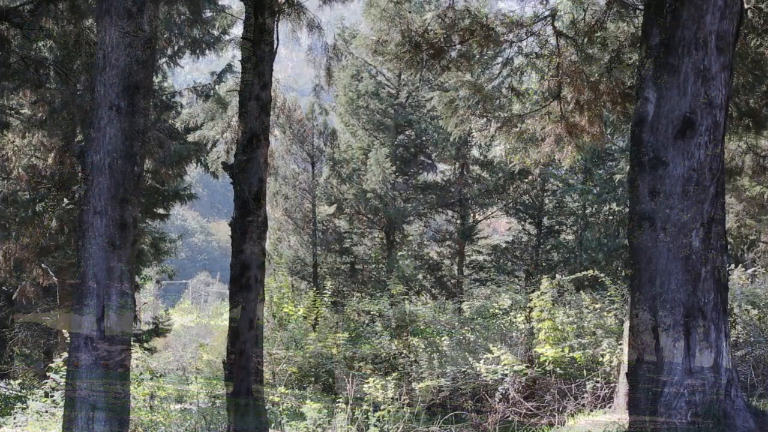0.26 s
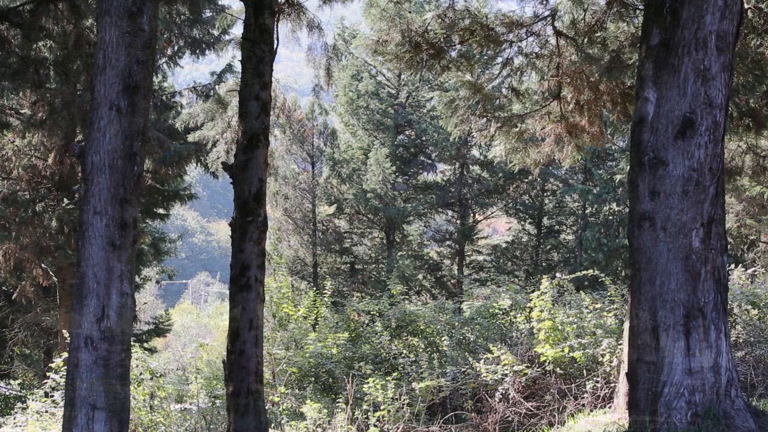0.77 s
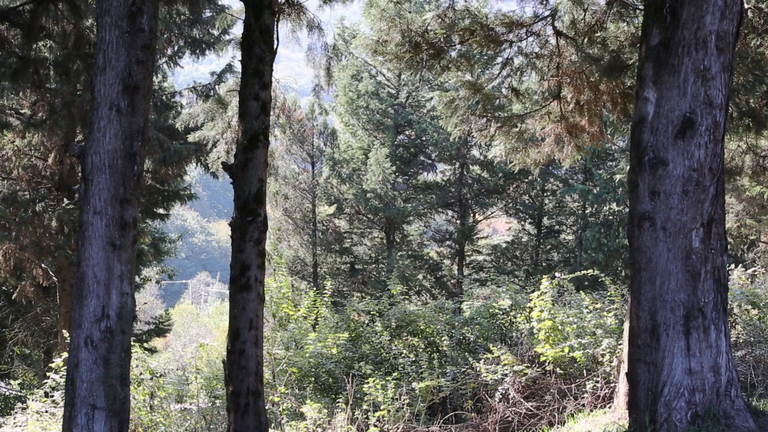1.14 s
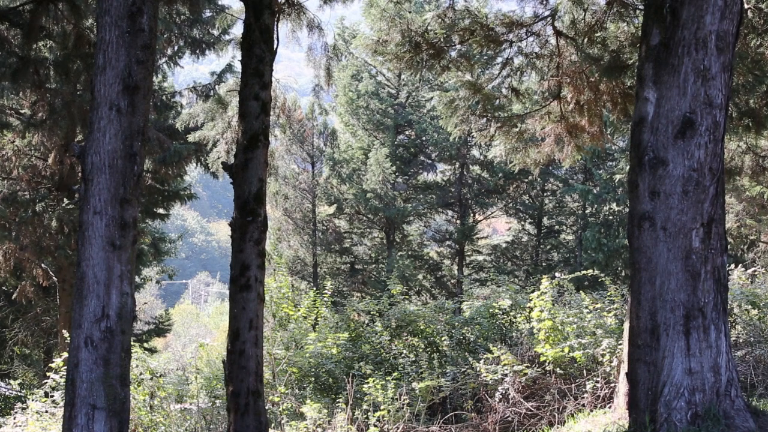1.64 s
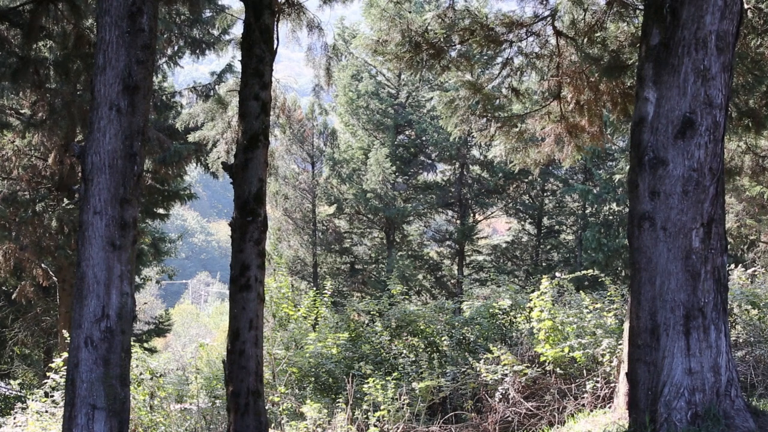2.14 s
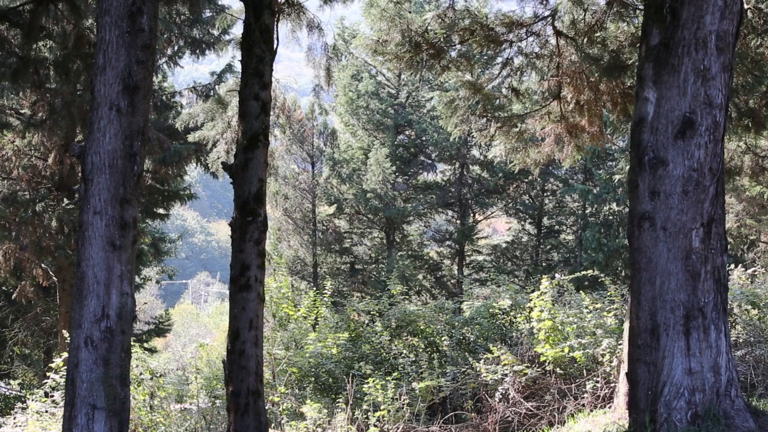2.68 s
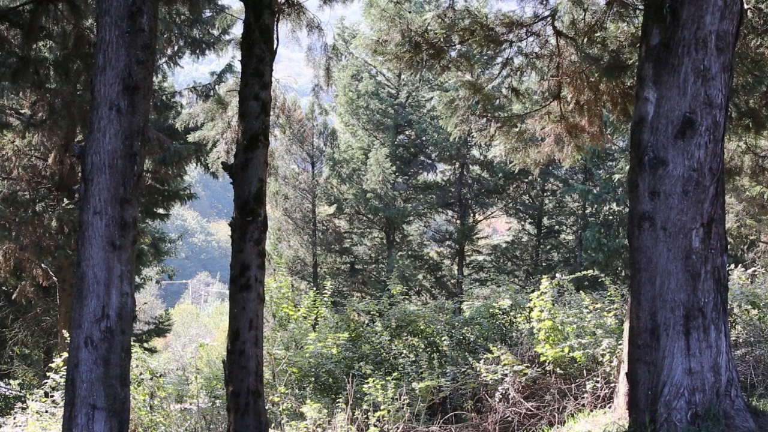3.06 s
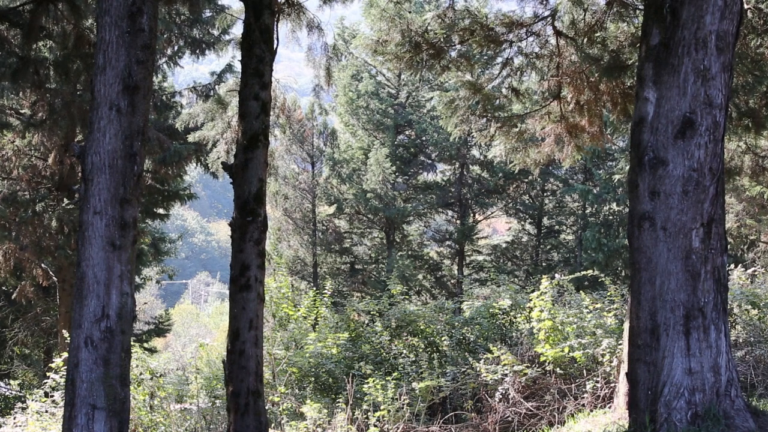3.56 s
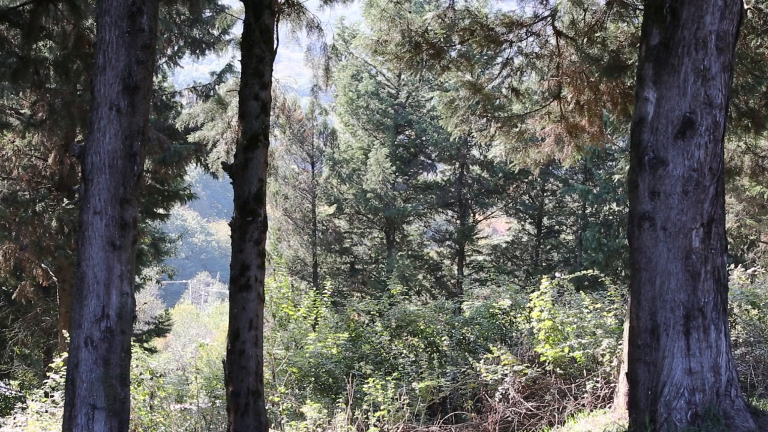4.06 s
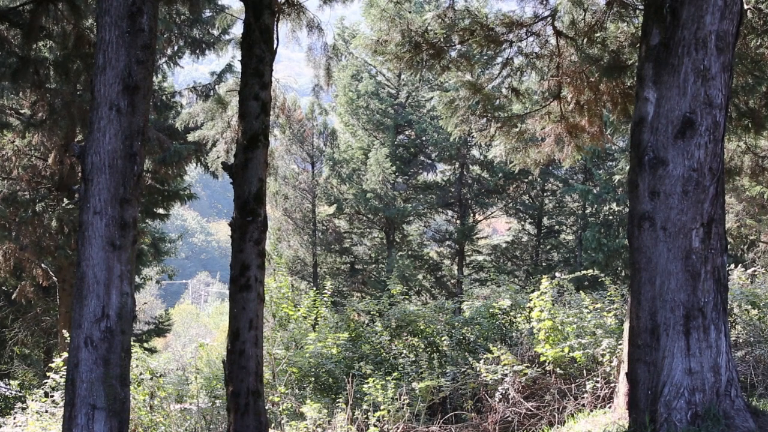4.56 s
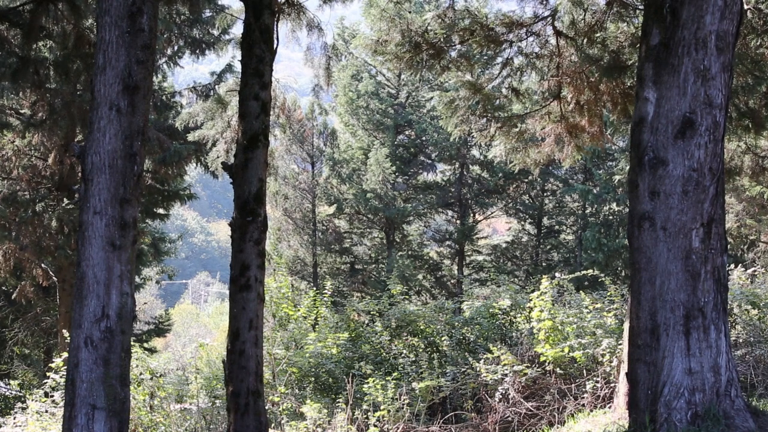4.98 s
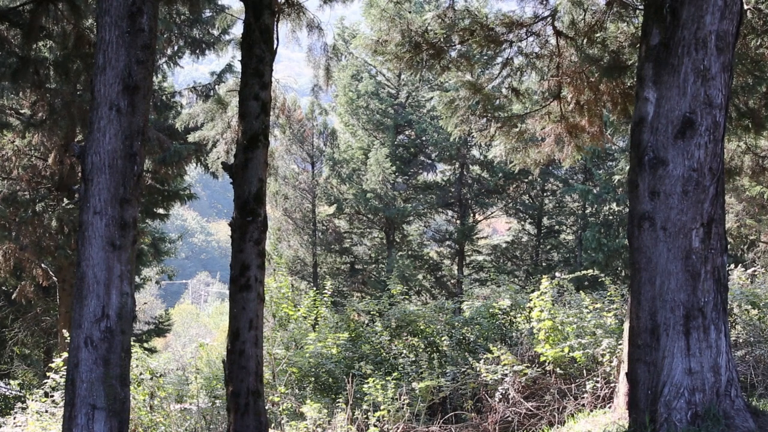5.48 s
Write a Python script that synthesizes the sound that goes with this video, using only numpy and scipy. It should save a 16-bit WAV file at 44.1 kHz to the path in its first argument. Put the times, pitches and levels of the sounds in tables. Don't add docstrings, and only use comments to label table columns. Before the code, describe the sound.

A quiet open wood, heard from a microphone among branches, with low wandering rumble, faint distant hum and smooth hiss throughout. Tiny ticking pips sound at 0.2-0.45 s, then a low, blurred two-voiced rasp until 0.75. At 0.8 the nearest bird gives a very short, piercing fall, much the loudest sound, scattering back from trees as a brief patter. Two hooked whistles with rough onsets come at 1.1 and 1.2, the second higher, rising and louder. Leaves stir softly; a dry twig snaps close by at 2.1. High thin two-voiced phrases run from 2.2 to 2.55, then a slur at 2.7 climbs into quick falling chips until 3.1. Thin bright whistles at 3.2 precede a burred downward phrase at 3.4. Faint far whistles and trills fill gaps. A short high buzz at 4.1, soft hooked warble from 4.4, sagging high whistles from 4.85, and a level whistle at 5.3 finish.

```python
import sys
import numpy as np
from scipy import signal
from scipy.fft import rfft, irfft
from scipy.io import wavfile
from scipy.ndimage import uniform_filter1d

SR = 44100
rng = np.random.default_rng(int(sys.argv[2]) if len(sys.argv) > 2 else 0)


def int16_out(signal):
    q = np.round(np.clip(np.atleast_2d(signal).T, -1, 1) * 32767)
    wavfile.write(sys.argv[1], SR, q.astype(np.int16))


def attenuation_scalar(level_db):
    decades = np.asarray(level_db, float) / 20
    return 10 ** decades


N = 252693
TIME = np.arange(N) / SR

# t/s, pitch f/Hz, level/dB
NEAREST_FALL = [
    [(.813, 8100, -51), (.822, 7680, -27.5), (.832, 7050, -15.5), (.848, 6580, -14.5), (.858, 6166, -14),
     (.868, 6200, -15.5), (.874, 6140, -16.5), (.879, 6000, -29.5)],
]
# octave level/dB, pitch wobble share, flutter/dB, vibrato f/Hz, vibrato share
VOICES = [(-46, .003, 2, 0, 0), (-60, .001, 1, 0, 0), (-60, .045, 2, 0, 0), (-60, .008, 3, 0, 0),
          (-60, .008, 3, 72, .022), (-60, .003, 1, 0, 0), (-60, .006, 1.5, 0, 0), (-60, .004, 1, 0, 0),
          (-60, .006, 2, 0, 0), (-60, .004, 3, 0, 0), (-60, .002, 2, 0, 0), (-60, .01, 3, 0, 0),
          (-60, .005, 3, 0, 0), (-60, .07, 4, 0, 0)]


def walk(rate):
    hold = int(SR / rate)
    steps = np.repeat(rng.standard_normal(N // hold + 1), hold)
    return 1.4 * uniform_filter1d(steps, hold)[:N]


def band(x, hz, width_hz):
    return signal.lfilter(*signal.iirpeak(hz, hz / width_hz, SR), x)


def syrinx(hz, db, start, end, overtone_db, fade=0.0011):
    phase = 2 * np.pi * np.cumsum(hz) / SR
    t = np.arange(len(hz)) / SR
    edge = np.minimum(t - start + fade, end - t + fade)
    gate = np.clip(edge / (2 * fade), 0, 1) ** 2
    tone = np.sin(phase) + attenuation_scalar(overtone_db) * np.sin(2 * phase)
    return np.sqrt(2) * attenuation_scalar(db) * gate * tone


def sing(notes, overtone_db, wobble, flutter_db, vibrato_hz, vibrato):
    saw = uniform_filter1d(signal.sawtooth(2 * np.pi * vibrato_hz * TIME, .25), size=60)
    shake = 1 + wobble * walk(200 + 8000 * wobble) + vibrato * saw
    flutter = flutter_db * walk(120)
    out = np.zeros(N)
    for note in notes:
        s, hz, db = np.transpose(note)
        a = max(int((s[0] - .01) * SR), 0)
        b = int((s[-1] + .01) * SR)
        pitch = uniform_filter1d(np.interp(TIME[a:b], s, hz), size=90) * shake[a:b]
        level_db = np.interp(TIME[a:b], s, db) + flutter[a:b]
        out[a:b] += syrinx(pitch, level_db, s[0] - TIME[a], s[-1] - TIME[a], overtone_db)
    return out


def strokes(rows, bend=1, crest=0.64, start_db=-3, end_db=-3):
    u = np.linspace(0, 1, num=9)
    swell_db = np.interp(u, [0, np.clip(crest, .02, .98), 1], [start_db, 0, end_db])
    notes = []
    for s, length, first, last, db in rows:
        pitch = first + (last - first) * u ** bend
        notes.append(np.transpose([s + length * u, pitch, db + swell_db]))
    return notes


def wood(x, near_db, tail_db, t60, echo_s, echo_db):
    t = TIME[:SR // 2]
    scatter = rng.standard_normal((2, len(t)))
    near, far = scatter * attenuation_scalar(3.47 * rng.standard_normal((2, len(t))))
    near *= attenuation_scalar(-60 * t / 0.069)
    far *= (1 - np.exp(-t / 0.0062)) * attenuation_scalar(-40 * t / t60 - 42 * (t / t60) ** 2)
    response = attenuation_scalar(near_db) * near / np.linalg.norm(near) + attenuation_scalar(tail_db) * far / np.linalg.norm(far)
    response[0] = 1
    response[int(echo_s * SR)] += attenuation_scalar(echo_db)
    return signal.fftconvolve(x, response)[:N]


def perch(notes, place):
    branch_db = [-8, -9.5, -2.5, -6, -1.5, -3.5, -2, -5, -7.5, -7, -1, -4, -1, -10.5]
    trunk_db = [-9.5, -6, -4.5, -9.5, -13, -9, -6, -14.5, -2.5, -2.5, -2, -7.5, -9.5, -3]
    trunk_t60_s = [0.49, 0.36, 0.17, 0.34, 0.45, 0.43, 0.54, 0.87, 0.41, 0.75, 0.41, 0.47, 0.44, .25]
    # delay/s, level/dB
    trunk_echo = [(.09, -28), (.045, -14), (.021, -9), (.03, -12), (.03, -12), (.021, -14), (.03, -16),
                  (.03, -16), (.03, -20), (.03, -14), (.04, -16), (.025, -15), (.03, -12), (.03, -12)]
    song = sing(notes, *VOICES[place])
    return wood(song, branch_db[place], trunk_db[place], trunk_t60_s[place], *trunk_echo[place])


def nearest_fall():
    return perch(NEAREST_FALL, 0)


def grove():
    first, last = 0.035, 0.19
    t = TIME[:int(.25 * SR)]
    patter = rng.standard_normal(len(t)) * attenuation_scalar(-12 * t / last)
    patter *= np.clip((t - first) / .03, 0, 1) * (t < last)
    call = band(sing(NEAREST_FALL, *VOICES[0]), 7370, 2500)
    return attenuation_scalar(-14) * signal.fftconvolve(call, patter / np.linalg.norm(patter))[:N]


def climbing_whistle():
    # t/s, pitch f/Hz, level/dB
    climb = [
        [(1.222, 2113, -58), (1.232, 3070, -31), (1.275, 3490, -25.5), (1.292, 3592, -21), (1.312, 3620, -25),
         (1.325, 3627, -15.5), (1.34, 3608, -18), (1.348, 3597, -35), (1.372, 3547, -18.5)],
    ]
    return perch(climb, 1)


def flat_whistle():
    # t/s, pitch f/Hz, level/dB
    hooked = [(1.108, 1790, -62), (1.118, 2600, -43), (1.132, 2955, -31.5), (1.144, 2979, -38),
              (1.158, 2955, -31), (1.19, 2958, -37.5), (1.2, 2900, -45)]
    return wood(sing([hooked], *VOICES[1]), -13.5, -8.5, .35, 0.027, -24)


def chucks():
    # t/s, length/s, first f/Hz, last f/Hz, level/dB
    chirps = [
        (1.096, 0.015, 4400, 4640, -44.5),
        (1.104, .011, 2950, 3970, -33.5),
        (1.204, 0.015, 3700, 4370, -44),
        (1.218, .012, 3150, 4510, -27),
    ]
    return perch(strokes(chirps, bend=0.716, crest=0.62, start_db=-7.0, end_db=-2.0), 2)


def chips():
    # t/s, pitch f/Hz, level/dB
    slur = [(2.708, 4160, -53), (2.722, 4040, -44.5), (2.736, 3710, -40.5), (2.765, 3670, -31.5),
            (2.785, 3720, -40), (2.814, 4000, -35), (2.822, 4270, -33), (2.827, 4700, -21)]
    # t/s, length/s, first f/Hz, last
    # f/Hz, level/dB
    falling = [(2.831, .003, 4950, 4650, -29), (2.836, 0.0027, 4650, 4350, -28),
               (2.847, 0.0052, 4480, 4360, -27), (2.852, 0.0029, 4700, 4300, -25),
               (2.879, 0.0036, 5800, 5400, -24.5), (2.882, 0.0063, 5250, 5000, -24),
               (2.89, 0.0025, 4900, 4500, -37), (2.896, 0.0019, 5200, 4800, -37),
               (2.901, 0.0052, 5100, 4150, -25.5), (2.909, 0.0055, 4750, 4350, -28),
               (2.938, 0.0064, 5950, 4800, -23), (2.945, 0.0023, 5850, 5500, -23.5),
               (3.0045, 0.0072, 5900, 4340, -25.5), (3.026, .003, 4750, 4300, -31),
               (2.956, 0.0034, 5500, 5000, -34), (2.968, 0.0046, 4400, 3770, -41)]
    # t/s, length/s, first f/Hz, last f/Hz, level/dB
    closing = [
        (3.0715, 0.0071, 5220, 3870, -27.5),
    ]
    notes = [slur] + strokes(falling, bend=0.96, crest=0.14, start_db=4, end_db=-4)
    notes += strokes(closing, bend=4.5, crest=0.35, start_db=-5.0, end_db=-7)
    return perch(notes, 5)


def falling_phrase():
    # t/s, length/s, first f/Hz, last f/Hz, level/dB
    steps = [
        (3.395, 0.012, 4620, 4740, -34.5),
        (3.408, 0.0097, 4480, 4610, -27),
        (3.472, 0.026, 3620, 3530, -37.5),
        (3.494, .016, 3480, 3150, -36.5),
        (3.51, 0.014, 3150, 3140, -51),
    ]
    # t/s, length/s, first f/Hz, last f/Hz, level/dB
    burr = [(3.418, 0.005, 4750, 3950, -32), (3.424, 0.0061, 4750, 3880, -26),
            (3.431, 0.0065, 4700, 3880, -25), (3.4395, 0.0055, 4650, 3900, -26),
            (3.447, 0.007, 4650, 3890, -27), (3.458, 0.0074, 4200, 3780, -30.5),
            (3.4665, 0.0051, 4200, 3730, -31)]
    clear = perch(strokes(steps, bend=0.85, crest=0.67, start_db=-5.0, end_db=-9.0), 6)
    return clear + perch(strokes(burr, bend=0.66, crest=0.4, start_db=0, end_db=-4), 7)


def high_phrases():
    # t/s, length/s, first f/Hz, last f/Hz, level/dB
    high = [(2.205, 0.026, 8350, 6700, -49), (2.23, 0.011, 7100, 7600, -36.5),
            (2.246, 0.042, 7980, 8120, -40), (2.288, 0.014, 8000, 7700, -41),
            (2.282, 0.0081, 7000, 6460, -33.5), (2.311, 0.021, 8120, 8120, -43),
            (2.348, .025, 8050, 7850, -54), (2.313, 0.0081, 6750, 6950, -32), (2.22, .09, 9000, 8600, -57),
            (2.398, 0.032, 8100, 7700, -44.5), (2.449, 0.0048, 7500, 6700, -32),
            (2.452, 0.013, 6470, 7000, -37), (3.211, .04, 8000, 7900, -46), (3.256, 0.024, 7980, 7600, -46),
            (3.212, 0.028, 9650, 9350, -60), (3.3, .035, 6500, 6400, -71)]
    return perch(strokes(high, bend=1.14, crest=0.24, start_db=-3.0, end_db=-3.0), 3)


def shiver():
    # t/s, length/s, first f/Hz, last f/Hz, level/dB
    held = [
        (2.427, 0.14, 7530, 7500, -38),
    ]
    return perch(strokes(held, crest=0.36, start_db=-8.5, end_db=-10.5), 4)


def rasp():
    # t/s, pitch f/Hz, level/dB
    sides_of_syrinx = [
        [(0.432, 2400, -46), (0.445, 2400, -37), (0.46, 2200, -35), (0.5, 2170, -42.5), (0.525, 2150, -48),
         (0.578, 2310, -38.5), (0.62, 2210, -43), (0.66, 2140, -50), (0.7, 2257, -52)],
        [(0.44, 2720, -52), (0.49, 2570, -45), (0.54, 2627, -50), (0.575, 2740, -47), (0.597, 2600, -40.5),
         (0.65, 2468, -43.5), (0.69, 2392, -48.5), (0.74, 2523, -55)],
    ]
    tracks = [np.transpose(side) for side in sides_of_syrinx]
    pitches = [np.interp(TIME, s, hz) * (1 + .006 * walk(250)) for s, hz, _ in tracks]
    low, high = (2 * np.pi * np.cumsum(pitch) / SR for pitch in pitches)
    gains = [attenuation_scalar(np.interp(TIME, s, db, -120, -120) + 3 * walk(150)) for s, _, db in tracks]
    low_gain, high_gain = uniform_filter1d(gains, size=300)
    beat = high - low + 1.45 * walk(300)
    sidebands = sum(attenuation_scalar(-3.0 - 4.8 * k) * np.sin(high + k * beat) for k in range(1, 6))
    bright = np.clip(np.minimum(TIME - .45, .68 - TIME) / 0.029, 0, 1)
    octave = attenuation_scalar(-13) * np.sin(2 * low)
    octave += attenuation_scalar(-23) * np.sin(2 * low + beat) + attenuation_scalar(-22) * np.sin(2 * low - beat)
    voice = low_gain * (np.sin(low) + bright * octave) + high_gain * (np.sin(high) + sidebands)
    return wood(np.sqrt(2) * voice, -12.5, -6.5, 0.37, .03, -17.5)


def buzz():
    # rate f/Hz, top f/Hz, depth f/Hz, level/dB, lower voice f/Hz, lower level/dB
    vibrato_arches = (57.5, 7450, 1150, -40, 6120, -46)
    # start t/s, end t/s, first crest t/s
    arch_times = (4.09, 4.177, 4.098)
    rate_hz, top_hz, depth_hz, db, low_hz, low_db = vibrato_arches
    start, end, crest = arch_times
    arch = np.sin(np.pi * rate_hz * (TIME - crest)) ** 2
    swell_db = -7 * np.clip((start + .03 - TIME) / .03, 0, 1) + 1.5 * walk(150)
    pitch = (top_hz - depth_hz * arch ** 1.8) * (1 + .008 * walk(120))
    upper_db = db + swell_db + 3 * np.sin(np.pi * arch)
    upper = syrinx(pitch, upper_db, start, end, -60, fade=.003)
    low_pitch = low_hz * (1 + 0.012 * walk(120))
    lower = syrinx(low_pitch, low_db + swell_db - 8 * arch, start, end, -60, fade=.003)
    return wood(upper + lower, -11, -8, 0.25, .035, -23)


def warble():
    # t/s, pitch f/Hz, level/dB
    tracked_falls = [
        [(4.49, 4080, -44), (4.497, 3590, -40.5), (4.506, 2960, -41), (4.515, 2740, -47), (4.523, 2800, -48)],
        [(4.612, 4600, -49), (4.62, 3500, -44), (4.626, 2800, -44), (4.634, 2550, -52)],
        [(4.738, 4550, -57), (4.744, 3850, -45), (4.748, 3650, -47), (4.753, 2970, -40), (4.762, 2340, -53)],
    ]
    # t/s, length/s, first f/Hz, last f/Hz, level/dB
    hooks = [(4.396, 0.021, 4060, 2700, -44.5), (4.448, 0.04, 3480, 3530, -47),
             (4.478, 0.011, 3450, 3250, -46.5), (4.552, 0.022, 4430, 3840, -51),
             (4.572, 0.028, 3800, 2900, -48), (4.69, 0.032, 3250, 2540, -51),
             (4.43, 0.013, 3300, 3550, -52), (4.765, .025, 3800, 4100, -64)]
    return perch(tracked_falls + strokes(hooks, bend=0.54, crest=0.75, start_db=-5.5, end_db=-4), 8)


def level_whistle():
    # t/s, pitch f/Hz, level/dB
    long_note = [(5.283, 2410, -51), (5.3, 3144, -48), (5.307, 3620, -44), (5.314, 3993, -42),
                 (5.35, 4034, -43.5), (5.42, 4140, -46.5), (5.5, 4140, -65), (5.56, 4070, -50.5),
                 (5.62, 4030, -62)]
    # t/s, length/s, first f/Hz, last f/Hz, level/dB
    pickup = [
        (5.27, .022, 3000, 3300, -48),
    ]
    return perch([long_note] + strokes(pickup, bend=0.28), 9)


def sagging_whistles():
    # t/s, pitch f/Hz, level/dB
    sags = [
        [(4.868, 8740, -47), (4.92, 8300, -53), (4.98, 8040, -45), (5.04, 7755, -46), (5.1, 7520, -56),
         (5.18, 7240, -55.5)],
        [(5.55, 8470, -70), (5.59, 8330, -66), (5.66, 8000, -64), (5.73, 7500, -69)],
        [(3.167, 9400, -70), (3.186, 8900, -51), (3.197, 8870, -31), (3.205, 8890, -44), (3.212, 8700, -49)],
        [(3.215, 8850, -52), (3.228, 8650, -48), (3.242, 8650, -46), (3.253, 8340, -41), (3.268, 8450, -56)],
    ]
    # t/s, length/s, first f/Hz, last f/Hz, level/dB
    thin = [
        (.045, 0.14, 8500, 7350, -63.5),
        (4.857, 0.0123, 8250, 8740, -50.5),
    ]
    return perch(sags + strokes(thin, bend=0.69, crest=0.53, start_db=-5.0, end_db=-7.0), 10)


def ticks(rows, hz, length, **shape):
    return strokes([(s, length, *hz, db) for s, db in rows], **shape)


def pips():
    # t/s, level/dB
    pip_rows = [
        (.231, -38),
        (.289, -32),
        (.349, -39),
        (.425, -44),
    ]
    # t/s, level/dB
    short_rows = [
        (.002, -53),
        (.191, -53),
        (.437, -60),
    ]
    # t/s, level/dB
    steep_rows = [
        (3.274, -54),
        (3.459, -44.5),
        (3.581, -52),
        (3.73, -49.5),
    ]
    after = [(s + .0035, db - 10) for s, db in pip_rows]
    notes = ticks(pip_rows, (5400, 6000), .002) + ticks(after, (4300, 7200), .004)
    notes += ticks(short_rows, (6500, 7320), 0.0089)
    notes += ticks(steep_rows, (5400, 7670), 0.0089, crest=0.49, start_db=-9, end_db=-5)
    return perch(notes, 11)


def twig():
    # t/s, f/Hz, level/dB, width/s
    snaps = [
        (2.12075, 1950, -18, .00024),
        (2.1217, 1150, -30, .0007),
        (2.1226, 560, -28, .0008),
        (2.1207, 5500, -48, .0004),
        (2.1246, 900, -38, .001),
    ]
    out = np.zeros(N)
    for s, hz, db, width in snaps:
        t = TIME - s
        out += attenuation_scalar(db) * np.exp(-.5 * (t / width) ** 2) * np.cos(2 * np.pi * hz * t)
    return out


def far_whistles():
    # t/s, length/s, first f/Hz, last f/Hz, level/dB
    faint = [(3.72, .15, 8330, 8020, -64), (3.92, .07, 8200, 8220, -66), (3.93, .17, 4380, 4340, -59),
             (4.1, .07, 3380, 3370, -66), (4.19, .07, 3380, 3370, -63), (4.255, .075, 8850, 8380, -70),
             (4.36, .015, 3960, 4380, -58), (4.83, .03, 5120, 5050, -66), (4.87, .1, 5100, 5050, -73),
             (4.955, .02, 4700, 3650, -61), (5.63, .1, 4150, 4260, -63), (3.27, .04, 1350, 1345, -52),
             (3.46, .1, 1370, 1320, -56), (3.655, .1, 1355, 1320, -55), (3.82, .025, 8500, 9000, -66),
             (4.0, .12, 3850, 3770, -67), (5.33, .05, 2800, 3000, -62), (5.375, .045, 3020, 3040, -59),
             (5.42, .075, 2930, 2880, -56), (5.5, .1, 2870, 2860, -66), (5.36, .03, 2060, 2200, -63),
             (5.065, .02, 3200, 3200, -60), (5.09, .03, 3000, 2980, -63), (5.0, .15, 5060, 5100, -74),
             (4.1, .05, 3000, 2980, -66), (3.775, .02, 3900, 4200, -62), (4.74, .05, 4850, 4850, -66)]
    return perch(strokes(faint, crest=0.25, start_db=-6.0, end_db=-8), 12)


def far_trills():
    # t/s, length/s, first f/Hz, last f/Hz, level/dB
    smeared = [(3.58, .18, 4050, 4450, -56), (4.26, .08, 4290, 4300, -56), (5.12, .07, 8250, 8100, -62),
               (4.68, .05, 6400, 6320, -67), (4.69, .05, 5720, 5460, -66), (5.04, .1, 6400, 6430, -65),
               (5.58, .04, 6090, 5960, -65), (.86, .05, 4500, 4430, -52), (2.45, .04, 3990, 4700, -57),
               (2.915, .075, 6500, 6600, -55), (5.06, .06, 3194, 3100, -67), (3.55, .08, 3280, 3400, -60),
               (4.53, .27, 3750, 3650, -61), (4.63, .17, 549, 559, -64), (0, .35, 450, 462, -61)]
    return perch(strokes(smeared, crest=0.54, start_db=-4.0, end_db=-8.5), 13)


def rustle():
    # t/s, level/dB, centre f/Hz, width f/Hz, t60/s
    bursts = [(.535, -44.5, 680, 1030, 0.26), (1.118, -40, 1500, 2010, 0.018), (1.159, -43, 910, 1010, .02),
              (1.171, -38.5, 4000, 9000, 0.011), (1.61, -47, 1440, 3000, 0.24), (1.94, -44, 775, 394, 0.05),
              (2.368, -42, 750, 302, 0.049), (2.38, -45.5, 680, 250, 0.093), (2.54, -50, 690, 500, 0.068),
              (2.674, -46.5, 1150, 300, 0.036), (.52, -63, 9000, 9900, .5), (3.3, -51, 920, 700, 0.11),
              (4.638, -43.5, 590, 1380, 0.17), (4.651, -40.5, 199, 150, 0.16), (4.675, -46, 870, 500, .1)]
    out = np.zeros(N)
    t = TIME[:SR // 4]
    for s, db, hz, width_hz, t60 in bursts:
        grains = band(band(rng.standard_normal(len(t)), hz, width_hz), hz, width_hz)
        shape = np.minimum(t / (0.029 * t60), 1) * attenuation_scalar(db - 60 * t / t60)
        out[int(s * SR):][:len(t)] += shape * grains / grains.std()
    return out


def breeze():
    # t/s, level/dB
    gusts = [(0, -65), (.45, -59.5), (.62, -52.5), (.9, -58.5), (1.3, -60.5), (1.8, -55), (2.3, -64),
             (2.85, -57), (3.4, -58), (3.8, -84), (5.73, -79)]
    hiss = band(rng.standard_normal(N), 1500, 2400)
    level_db = np.interp(TIME, *np.transpose(gusts)) + 1.1 * walk(8.2)
    return attenuation_scalar(level_db) * hiss / hiss.std()


def air():
    # f/Hz, level/dB per Hz
    spectrum = [(22, -49.5), (38, -9), (156, 1), (309, -9), (360, -9.5), (553, -13.5), (695, -14),
                (1560, -16.5), (2280, -18.5), (2720, -18.5), (4280, -20.5), (4740, -22), (7280, -25.5),
                (8260, -26), (15900, -31.5)]
    # f/Hz, width f/Hz, level/dB
    drone = [
        (134, 56, -59.5),
        (178, 17, -78),
        (294.5, 21, -65),
        (452, 14, -79),
    ]
    hz = np.fft.rfftfreq(N, 1 / SR)
    point_hz, point_db = np.transpose(spectrum)
    colour = attenuation_scalar(np.interp(np.log(hz + 1), np.log(point_hz), point_db))
    low = 1 / (1 + (hz / 400) ** 2)
    rumble = irfft(rfft(rng.standard_normal(N)) * colour * np.sqrt(low), N)
    hiss = irfft(rfft(rng.standard_normal(N)) * colour * np.sqrt(1 - low), N)
    bed = rumble * attenuation_scalar(.6 * walk(3) + .6 * walk(15)) + hiss * attenuation_scalar(.2 * walk(4))
    out = attenuation_scalar(-50) * bed / bed.std()
    for centre_hz, width_hz, db in drone:
        hum = band(band(rng.standard_normal(N), centre_hz, width_hz), centre_hz, width_hz)
        out += attenuation_scalar(db) * hum / hum.std()
    return out


def scene():
    birds = nearest_fall() + climbing_whistle() + chucks() + high_phrases() + shiver() + chips()
    birds += falling_phrase() + warble() + level_whistle() + sagging_whistles() + pips()
    birds += far_whistles() + far_trills()
    birds += rasp() + buzz()
    noises = twig() + rustle() + air() + breeze()
    return (birds + noises + grove() + flat_whistle())[None]


def band_limit(x):
    return signal.sosfilt(signal.butter(12, 16090, fs=SR, output="sos"), x)


def record(dry):
    top_hz = 15790
    low_pass = signal.ellip(10, .2, 70, top_hz, fs=SR, output="sos")
    cut = signal.sosfilt(low_pass, dry)
    return band_limit(cut)


dry = scene()
out = record(dry)
int16_out(out)
```